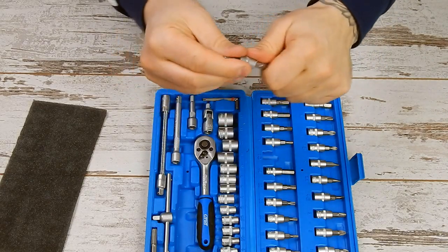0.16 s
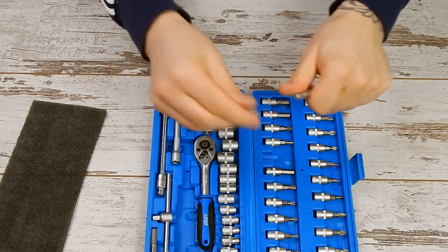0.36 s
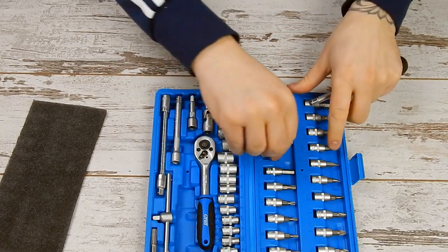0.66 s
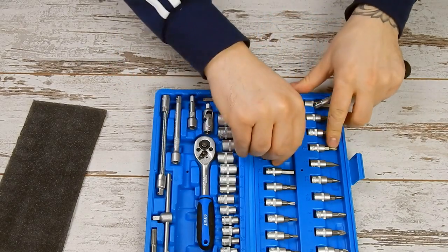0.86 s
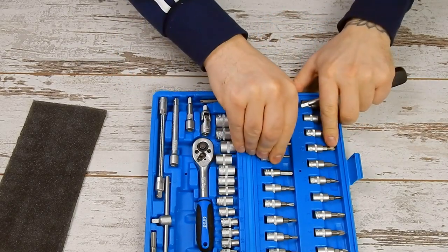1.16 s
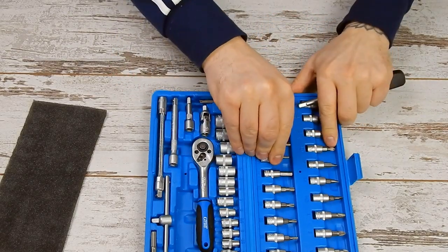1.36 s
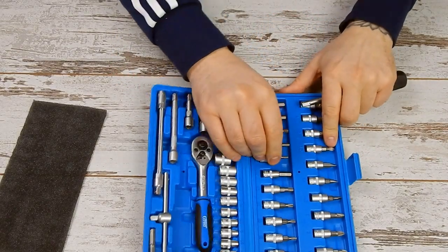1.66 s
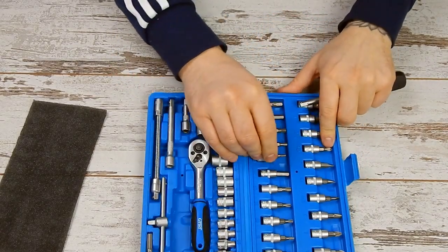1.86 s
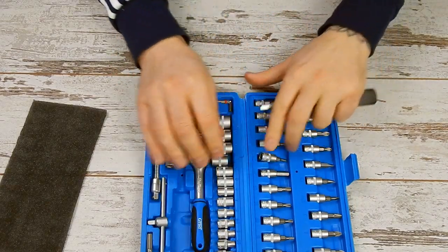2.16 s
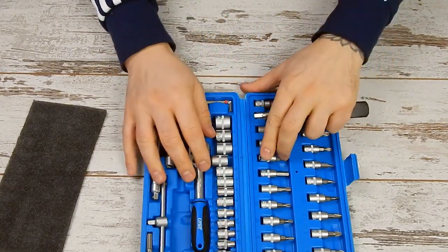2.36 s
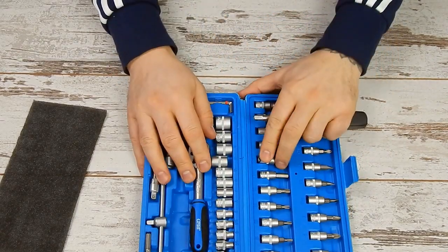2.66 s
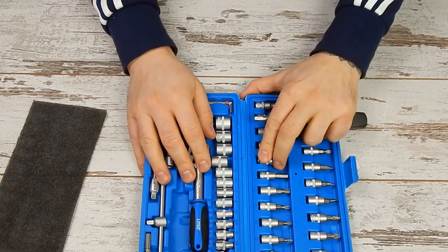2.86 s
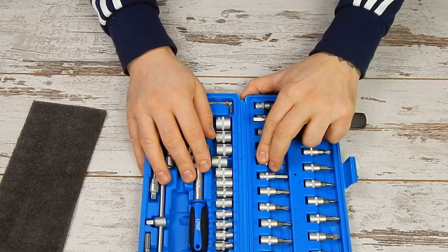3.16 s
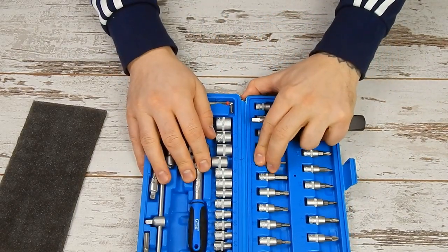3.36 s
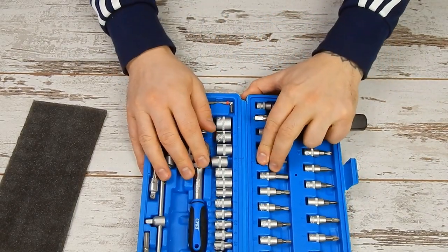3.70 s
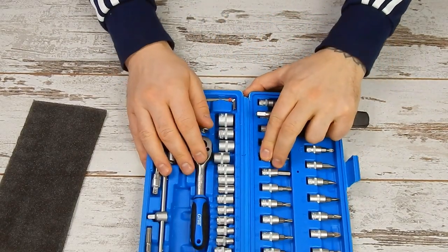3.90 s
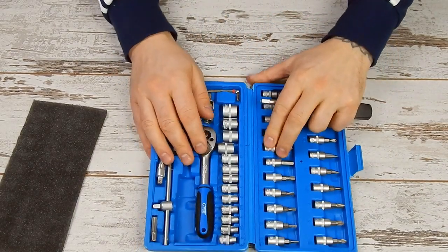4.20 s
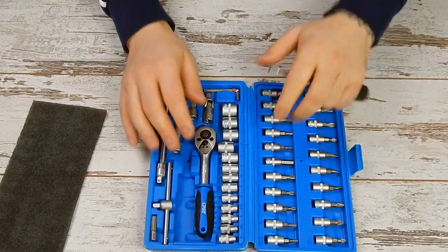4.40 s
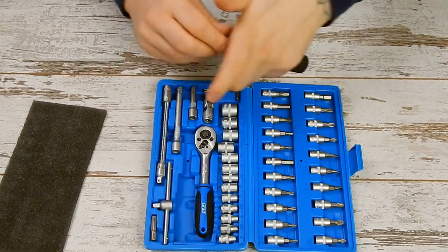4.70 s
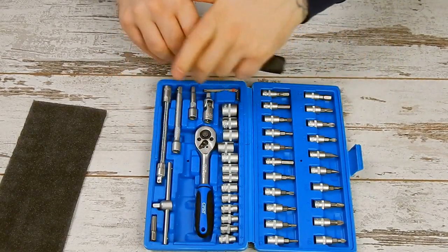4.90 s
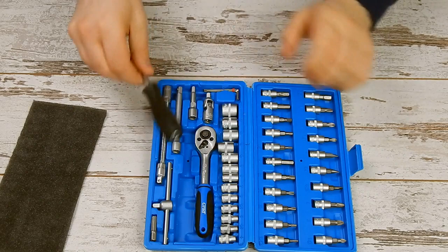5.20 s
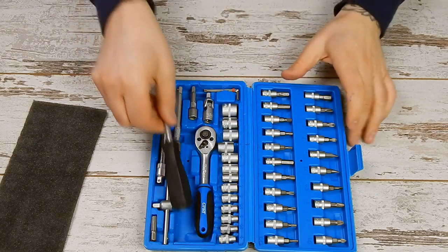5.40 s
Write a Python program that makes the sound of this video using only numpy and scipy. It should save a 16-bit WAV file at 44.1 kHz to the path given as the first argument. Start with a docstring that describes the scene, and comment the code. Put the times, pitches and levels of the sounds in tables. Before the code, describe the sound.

Steel sockets clack and snap into a hollow plastic tool case, which knocks on a table, over a faint hum.

```python
"""A small room with a mains hum, where hands sort steel sockets into a plastic tool case on a table.
Two steel pieces clink, with a brief swell of hiss. The hollow case knocks on the table and rocks to rest.
Sockets are pressed home: stiff clips pop, and the sockets clack and rattle into their slots.
A screwdriver is laid in. Between the clicks, fingers and steel rub over the plastic."""
import sys
import numpy as np
from scipy import signal
from scipy.fft import rfft, irfft
from scipy.io import wavfile

SR = 44100
rng = np.random.default_rng(int(sys.argv[2]) if len(sys.argv) > 2 else 0)


def generate_wav(signal):
    """Clip the signal to [-1, 1] and save it as 16-bit WAV at the path in sys.argv[1]."""
    frames = np.transpose(np.atleast_2d(signal))
    scaled = np.clip(frames, -1, 1) * 32767
    pcm = np.round(scaled).astype(np.int16)
    wavfile.write(sys.argv[1], SR, pcm)


N = 244622
TIME = np.arange(N) / SR


def gain(db):
    """Turn decibels into a number to multiply by."""
    return 10 ** (np.asarray(db) / 20)


def normalise(x):
    """Scale a sound so that its average strength (rms) is 1."""
    return x / np.sqrt(np.mean(x ** 2))


def read_curve(points, hz):
    """Read between (f/Hz, value) points, with every octave equally wide."""
    f, value = np.transpose(points)
    return np.interp(np.log(np.maximum(hz, 1)), np.log(f), value)


def frequencies(size):
    """The frequencies in the spectrum of a sound of this many samples."""
    return np.fft.rfftfreq(size, 1 / SR)


def quickest_response(gains):
    """The promptest answer to a click that has these gains at each frequency."""
    cepstrum = irfft(np.log(gains))
    half = len(cepstrum) // 2
    cepstrum[1:half] *= 2
    cepstrum[half + 1:] = 0
    return irfft(np.exp(rfft(cepstrum)))


def shape_tone(x, points):
    """Turn lows and highs up or down along (f/Hz, level/dB) points."""
    response = quickest_response(gain(read_curve(points, frequencies(4096))))
    return signal.fftconvolve(np.atleast_2d(x), response[None], axes=1)[:, :x.shape[-1]]


def octaves(x):
    """Split a sound into (f/Hz, band) pairs; the bands add up to the whole."""
    size = x.shape[-1]
    centres = 62.5 * 2 ** np.arange(9)
    spectrum, hz = rfft(x), frequencies(size)
    shares = [read_curve(list(zip(centres, centres == c)), hz) for c in centres]
    return [(c, irfft(spectrum * share, size)) for c, share in zip(centres, shares)]


def add(out, s, sound):
    """Mix a sound in, starting at s seconds."""
    start = max(int(s * SR), 0)
    part = sound[:, :max(N - start, 0)]
    out[:, start:start + part.shape[1]] += part


# how alike the two ears hear noise: f/Hz, likeness (1 = the same)
EAR_LIKENESS = [(100, 0.85), (300, 0.82), (600, 0.77), (1200, 0.62), (2500, 0.13), (6000, 0.073),
                (14000, 0.16)]

def surround_noise(size):
    """White noise from all around: alike at both ears in the bass, unrelated in the treble."""
    alike = np.clip(read_curve(EAR_LIKENESS, frequencies(size)), 0, .995)
    mid, side = rfft(rng.standard_normal((2, size)))
    mid, side = mid * np.sqrt((1 + alike) / 2), side * np.sqrt((1 - alike) / 2)
    return irfft(np.array([mid + side, mid - side]), size)


# how long the echoes take to fade by 60 dB: f/Hz, fade time/s
ECHO_FADE = [(100, 0.47), (400, 0.27), (800, 0.33), (1600, 0.24), (3500, 0.21), (7000, 0.23),
             (14000, 0.097)]

def in_room(sound, room_db, build_s=0.0022, right_db=1):
    """A sound plus the dense echoes of a small room, whose treble dies first."""
    t = TIME[:SR // 2]
    bands = octaves(surround_noise(len(t)))
    echoes = sum(band * gain(-60 * t / read_curve(ECHO_FADE, hz)) for hz, band in bands)
    echoes *= 1 - np.exp(-(t / build_s) ** 2)
    paths = gain(room_db) * echoes / np.linalg.norm(echoes[0])
    paths[:, 0] += 1  # the straight path to the ears
    left, right = signal.fftconvolve(sound, paths, axes=1)
    # the treble beams a little to the right
    return np.vstack([shape_tone(left, [(500, 0.026), (2000, -right_db)]),
                      shape_tone(right, [(500, 0.026), (2000, right_db)])])


def contact(push_hz, chatter_s):
    """The force of a hit: a smooth push gives the lows, a moment of gritty chatter the highs."""
    t = TIME[:SR // 20]
    chatter = surround_noise(len(t)) * np.exp(-t / chatter_s)
    chatter /= np.linalg.norm(chatter[0])
    push = signal.sosfilt(signal.butter(2, push_hz, fs=SR, output="sos"), 1. * (t == 0))
    return push + signal.sosfilt(signal.butter(2, push_hz, "high", fs=SR, output="sos"), chatter)


def ring(tones, force, damping=1, detune=0.0041, spread_s=0.001157):
    """A force rings an object's own tones; each touch shifts them a little, a hand can damp them."""
    f = frequencies(32768)
    hz, width, db = np.transpose(tones)[:, :, None]
    hz = hz * (1 + detune * rng.standard_normal(hz.shape))
    power = gain(db) ** 2 / (1 + ((f ** 2 - hz ** 2) / (damping * width * hz)) ** 2)
    ringing = quickest_response(np.sqrt(power.sum(axis=0)))
    # bending waves spread out: 1 kHz arrives spread_s late, lower tones later still
    travel = np.exp(-4j * np.pi * spread_s * np.sqrt(1000 * f))
    response = irfft(rfft(ringing) * travel)
    return signal.fftconvolve(np.atleast_2d(force), response[None, :SR // 2], axes=1)


def dip(s, deepest_s):
    """A curve that leaves 0 at time s, reaches 1 after deepest_s and returns more slowly."""
    age = np.maximum(TIME - s, 0) / deepest_s
    return (age * np.exp(1 - age)) ** 2


# the tones of the hum: f/Hz, level/dB
HUM_TONES = [(119.8, -47.5), (55.6, -74), (182.6, -70.5), (424, -67.5)]
# the tone of the room noise: f/Hz, relative level/dB
AIR_TONE = [(25, -29), (48, -31), (70, -12), (105, -11), (160, -14.5), (250, -25.5), (430, -14.5),
            (560, -22.5), (900, -23.5), (1500, -28), (2500, -34), (5300, -43.5), (11500, -45), (15500, -46)]
# the background sinks after the sharpest snaps: t/s, treble change/dB, time to the lowest point/s
BACKGROUND_DIPS = [(1.97, -8.5, 0.11), (3.27, -26.5, 0.26)]
# how much of a dip each pitch gets: f/Hz, share
DIP_SHARES = [(120, 0.28), (500, 0.27), (1500, 0.28), (4000, 0.49), (10000, 0.98)]

def hum_and_air(air_db=-52):
    """A mains hum and soft room noise; both sink briefly twice, the treble most."""
    dip_db = sum(db * dip(s, deepest_s) for s, db, deepest_s in BACKGROUND_DIPS)
    air = gain(air_db) * normalise(shape_tone(surround_noise(N), AIR_TONE))
    hum = [(hz, gain(db) * np.sqrt(2) * np.sin(2 * np.pi * hz * TIME)) for hz, db in HUM_TONES]
    return sum(part * gain(dip_db * read_curve(DIP_SHARES, hz)) for hz, part in octaves(air) + hum)


def swells(table):
    """For each row, the level rises and falls in one smooth arch."""
    return sum(gain(db) * np.cos(np.pi * np.clip((TIME - s) / length, -.5, .5))
               for s, length, db in table)


# the tones of the loaded case (wider ones die sooner): f/Hz, width/Hz, level/dB
CASE_TONES = [(86.5, 9.4, 2.5), (132.2, 6.5, 8), (173, 42, -3), (205, 17, -8.5), (350, 54, -1.5),
              (393, 17, 2.5), (439, 27.7, 8), (545, 15, 2), (567, 50, 4.5), (617, 16, -6), (690, 51, 4),
              (815, 1.8, 2), (818, 3.6, 4.5), (867, 77, -1), (860, 39, -1.5), (1044, 50, -1),
              (1229, 61, 0.5), (1355, 165, -3.5), (1598, 25, -5.5), (1902, 250, -5), (2327, 74, -6.5),
              (2712, 32, -5.5), (3000, 330, -10.5), (3480, 300, -18), (4150, 1100, -18.5),
              (6440, 1500, -27.5), (8900, 890, -27.5), (10800, 2500, -25.5), (12400, 2300, -39)]
# the tone of the hiss: f/Hz, relative level/dB
HISS_TONE = [(1500, -8), (3500, 5.5), (4500, 4), (5300, 2.5), (6300, 2.5), (7500, -1), (10500, 4.5),
             (13000, -1.5), (16000, -12)]
# sockets drag over the plastic: middle t/s, length/s, level/dB
SOCKET_SCRAPES = [(.766, 0.26, -49.5), (1.08, 0.18, -51.5), (1.47, .26, -49), (1.59, 0.19, -39),
                  (1.735, 0.14, -26), (2.43, 0.66, -50.5), (4.11, 0.61, -48.5)]
# swells of hiss: middle t/s, length/s, level/dB
# row two is a brief swell around the second steel clink; the others are fingers gliding
HISS_SWELLS = [(.081, .11, -50), (.139, .036, -36), (.9, 1.48, -66.5), (2.48, 0.71, -68),
               (4.204, 0.18, -56.5), (5.05, 0.22, -59.5)]

def scrapes_and_hiss(grain_db=6, scrape_hiss_db=-20):
    """Steel sticks and slips on plastic: tiny jerks ring the hand-damped case. Hiss comes and goes."""
    jerks = rng.standard_normal(N)
    jerks *= gain(grain_db * rng.standard_normal(N // 100 + 1)).repeat(100)[:N]
    scrape = ring(CASE_TONES, jerks, damping=2.3)
    scrape = shape_tone(scrape, [(150, 7.5), (450, 10.0), (1200, 7.5), (3000, 5.5), (9000, 1.5)])
    scrape = normalise(in_room(scrape, room_db=15)[:, :N])
    hiss = normalise(shape_tone(surround_noise(N), HISS_TONE))
    dragging = swells(SOCKET_SCRAPES) * (scrape + gain(scrape_hiss_db) * hiss)
    return dragging + swells(HISS_SWELLS) * hiss


# the tones of a steel piece damped by the fingers: f/Hz, width/Hz, level/dB
STEEL_TONES = [(2200, 500, -1.5), (2940, 240, 10), (3540, 280, 10), (3600, 360, 4.5), (4600, 2400, -7.5),
               (5900, 720, 4.5), (7200, 1400, -11.5), (9300, 2100, 4.5), (11100, 970, -0.5),
               (12350, 1600, 5), (14000, 1200, -7)]
# steel hits steel: t/s, level/dB, high tick/dB
STEEL_HITS = [(0.0631, -9, -2), (0.1407, 1, -4), (.144, -0.5, -18), (3.632, -31, 1.5), (5.5065, -15, -8)]

def steel_clinks():
    """Two steel pieces meet between the fingers and ring briefly."""
    out = np.zeros((2, N))
    for s, db, tick_db in STEEL_HITS:
        clink = ring(STEEL_TONES, contact(push_hz=1870, chatter_s=0.0089))
        tone = [(500, -13.5), (1500, -14.0), (2800, -5), (6000, -4.5), (11000, tick_db)]
        add(out, s, gain(db) * in_room(shape_tone(clink, tone), room_db=-3))
    return out


def bounces(tone, gap_s, loss_db, dull_db, gap_shrink=0.82):
    """A hit on the case and three ever quicker, weaker bounces; dull_db cuts the treble each time."""
    out, s = np.zeros((2, SR)), 0
    for k in range(4):
        hit = ring(CASE_TONES, contact(push_hz=2100, chatter_s=0.0026))
        add(out, s, gain(k * loss_db) * shape_tone(hit, [(1400, 0), (3000, -k * dull_db)]))
        s += gap_s * gap_shrink ** k
    return shape_tone(out, tone)


# the middle pitches of a hollow box: f/Hz, level/dB
BOX_TONE = [(450, 4), (850, -1.5), (1600, 0)]
# the case hits the table: t/s, level/dB, low thud/dB, hard edge/dB, high tick/dB, change per bounce/dB
TABLE_HITS = [(0.586, -10.5, 0.5, 6, 4, -9), (.646, 1.5, -2, 9, 4, -29), (.729, -7, -7, -2, 3, -20),
              (1.082, -12.5, 10.5, -10, -10, -21), (1.426, -13, 15, 1.5, -14, -17),
              (1.7108, 19.5, 4, 7, 1, -2.5), (1.878, -4, 2, 0.5, 2.5, -24), (5.5057, 8, 1, 4, -6.5, -19)]

def case_knocks():
    """Heavy pushes thump the case, which rocks to rest and is too small to give off deep bass."""
    out = np.zeros((2, N))
    for s, db, thud_db, edge_db, tick_db, loss_db in TABLE_HITS:
        lows = [(45, -14), (80, thud_db), (220, thud_db - 1)]
        highs = [(3100, edge_db), (11000, tick_db)]
        knock = bounces(lows + BOX_TONE + highs, gap_s=0.02, loss_db=loss_db, dull_db=4)
        add(out, s, gain(db) * in_room(knock, room_db=2))
    return out


# the tones of the stiff clip that holds a socket: f/Hz, width/Hz, level/dB
CLIP_TONES = [(758, 84, 38), (770, 13, 28), (1036, 84, 31.5), (1280, 84, 27), (3100, 130, 18.5),
              (3600, 480, 9), (10700, 650, 12)]
# a clip springs back: t/s, level/dB
CLIP_RELEASES = [(.735, -31.5), (1.085, -39), (1.9702, -20), (3.2735, -2)]

def clip_pops():
    """Under a firm press a clip springs back against the socket with a hollow pop and a bright tick."""
    out = np.zeros((2, N))
    for s, db in CLIP_RELEASES:
        pop = ring(CLIP_TONES, contact(push_hz=2000, chatter_s=0.0012), spread_s=0.000474)
        pop = shape_tone(pop, [(250, -9.5), (600, -0.5)])
        add(out, s, gain(db) * in_room(pop, room_db=-7))
    return out


# the middle pitches of a dry clack: f/Hz, level/dB
CLACK_TONE = [(850, 1.5), (1600, 5), (3100, -0.5)]
# a socket lands: t/s, level/dB, hollowness/dB, high tick/dB, echo/dB, first gap/s, change per bounce/dB
SOCKET_HITS = [(1.5457, 15.5, -0.5, 1, 1.5, .027, -6), (1.588, 8, -4.5, -4, 3.5, .014, -8.5),
               (1.645, -6.5, -16, 2, 7, .012, -18), (1.9682, 22.5, -14.5, -4, 0, .040, -13),
               (2.278, -7, -3, -17, 4, .013, -6.5), (2.429, -9, -5, -24, 2.5, .015, -19),
               (2.595, 7.5, -13, -5.5, -2, .01, -13), (3.2716, 19.5, -4.5, 5, -4.5, .0104, -10.5),
               (4.237, -8.5, 7.5, -20, -2.5, .01, -21), (4.308, -7, -1, -17, -4.5, 0.007, -16),
               (4.377, -13.5, -7, -31, -3, .01, -16)]

def socket_snaps(thud_db=-16.5):
    """Sockets, too light to thump the case, clack into their slots and rattle until they sit."""
    out = np.zeros((2, N))
    for s, db, hollow_db, tick_db, room_db, gap_s, loss_db in SOCKET_HITS:
        tone = [(160, thud_db), (450, hollow_db)] + CLACK_TONE + [(11000, tick_db)]
        rattle = bounces(tone, gap_s, loss_db, dull_db=-1.5)  # below zero: each bounce is brighter
        add(out, s, gain(db) * in_room(rattle, room_db))
    return out


def scene():
    """Everything on and around the table, added together."""
    hits = steel_clinks() + case_knocks() + socket_snaps() + clip_pops()
    return hits + scrapes_and_hiss() + hum_and_air()


def record(dry, low_cut_hz=42, top_hz=15650, ceiling=0.85):
    """Thin the deep bass, round off the loudest peaks and cut the very highest treble."""
    thin = signal.sosfilt(signal.butter(2, low_cut_hz, "high", fs=SR, output="sos"), dry)
    rounded = ceiling * np.tanh(thin / ceiling)
    return signal.sosfilt(signal.ellip(10, .1, 80, top_hz, fs=SR, output="sos"), rounded)


dry = scene()
out = record(dry)
generate_wav(out)
```